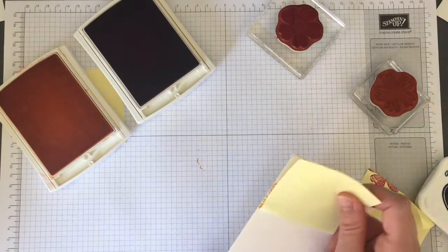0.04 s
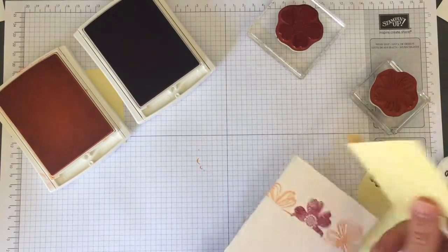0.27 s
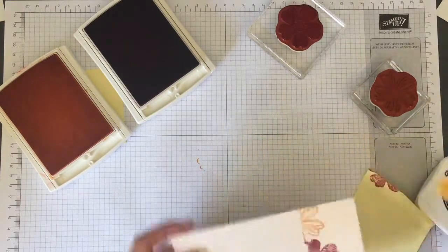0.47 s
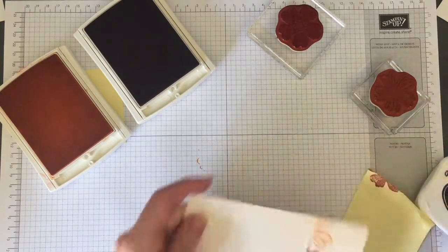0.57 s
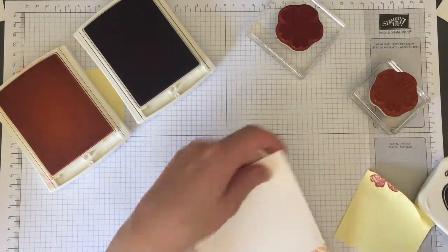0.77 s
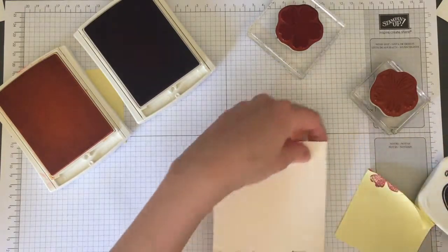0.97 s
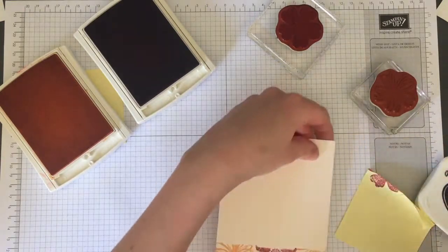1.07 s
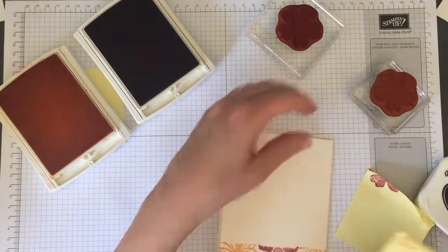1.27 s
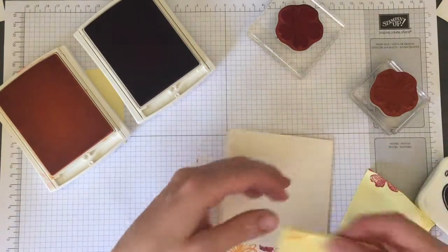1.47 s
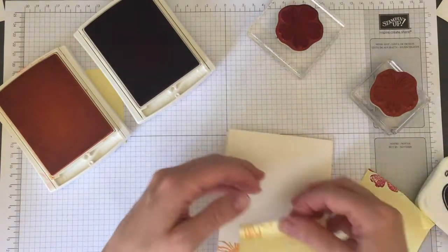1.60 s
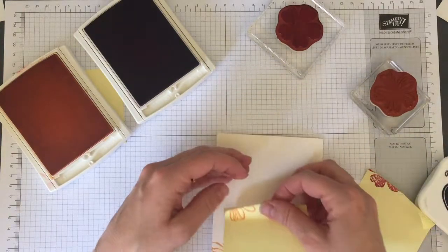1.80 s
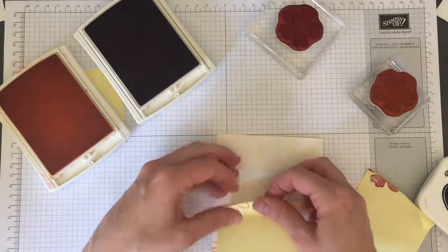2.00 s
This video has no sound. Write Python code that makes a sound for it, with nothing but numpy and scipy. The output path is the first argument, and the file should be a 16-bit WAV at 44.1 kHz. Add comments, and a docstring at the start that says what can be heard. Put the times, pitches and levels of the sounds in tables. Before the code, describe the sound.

Paper handled up close: a sticky note peels free and a card slides and rustles.

```python
"""A sticky note peels off a card, close up: the glue fizzes, its last strands snap, the freed paper flaps.
The card is tapped, then slides over a paper mat with a friction hiss, a catching edge and light knocks.
Fingers brush the paper and hands push softly on the table.
Behind it, a small room with faint rumble, hiss and appliance hum."""
import sys
import numpy as np
from scipy import signal
from scipy.fft import rfft, irfft
from scipy.io import wavfile

SR = 44100
rng = np.random.default_rng(int(sys.argv[2]) if len(sys.argv) > 2 else 0)


def int16_out(signal):
    """Quantize to a 16-bit WAV file."""
    q = np.round(np.clip(np.atleast_2d(signal).T, -1, 1) * 32767)
    wavfile.write(sys.argv[1], SR, q.astype(np.int16))


N = 90404
T = np.arange(N) / SR
HZ = np.fft.rfftfreq(4096, 1 / SR)

# resonances of the note and of the card on the mat: f/Hz, gain/dB
NOTE_RESONANCES = [(1415, 3.5), (2240, 6), (2380, 6.5), (2510, -2), (2810, 6), (3115, 4.5), (3500, 6.5),
                   (3985, 7), (4617, 7), (5327, 5), (6675, 6.5), (7348, 6), (9300, 6)]
CARD_RESONANCES = [(370, 3), (790, 12), (970, 10), (1610, 10), (2500, 11), (3230, 5.5), (4350, 0.5),
                   (5240, 3.5), (6430, 5), (8450, 4.5), (9400, 3), (12300, 5)]
NOTE_Q, CARD_Q = 29.4, 16
# struck card spectrum: f/Hz, level/dB
CARD_SPECTRUM = [(120, -14), (220, -20), (320, 1.5), (600, -3.5), (900, -3.5), (1200, -2), (1500, -1.5),
                 (2500, -4), (8000, -4.5), (16000, 5)]


def amp(db):
    """dB to gain."""
    return 10 ** (np.asarray(db) / 20)


def unit(x):
    """Scale to rms 1."""
    return x / np.sqrt(np.mean(x ** 2) + 1e-20)


def curve(points, hz=HZ):
    """Interpolate over log frequency."""
    f, value = np.transpose(points)
    return np.interp(np.log(hz + 1), np.log(f + 1), value)


def level(points):
    """Gain along a level curve, silent outside it."""
    t_s, db = np.transpose(points)
    return amp(np.interp(T, t_s, db, left=-np.inf, right=-np.inf))


def add(mix, at_s, sound):
    """Mix a sound in at at_s."""
    part = mix[max(round(at_s * SR), 0):][:len(sound)]
    part += sound[:len(part)]


def response(db):
    """Minimum-phase impulse response of a spectrum, energy 1."""
    cepstrum = np.fft.irfft(np.log(amp(np.maximum(db, db.max() - 90))))
    half = len(cepstrum) // 2
    cepstrum[1:half] *= 2
    cepstrum[half + 1:] = 0
    impulse = irfft(np.exp(rfft(cepstrum)))[:half]
    return impulse / np.linalg.norm(impulse)


def ring(hz, db, q):
    """One resonance as a bump in dB; taller means wider skirts."""
    return db / (1 + (2 * q * (HZ / hz - 1)) ** 2 * 10 / (abs(db) + 3.0))


def body(modes, q):
    """All resonances of a sheet, in dB."""
    return sum(ring(hz, db, q) for hz, db in modes)


def grains(size, per_s, spread_db, smooth):
    """Tiny slips of uneven strength over smooth hiss, rms 1."""
    occurs = rng.random(size) < per_s / SR
    strength = amp(spread_db * np.minimum(rng.exponential(1, size), 4))
    slips = occurs * strength * rng.choice([-1., 1.], size)
    return unit(unit(slips) + smooth * rng.standard_normal(size))


def excite(drive, envelope, colour_db):
    """A shaped drive rings the paper; output energy equals the envelope's."""
    out = signal.fftconvolve(drive * envelope, response(colour_db))
    return out * np.linalg.norm(envelope) / (np.linalg.norm(out) + 1e-20)


def taps(rows, sheet_db):
    """A sheet buckles or lands: short low-passed bursts, each with its own peak or dip."""
    out, t = np.zeros(N), np.arange(SR // 8) / SR
    for at_s, rise_s, decay_s, db, ring_hz, ring_db, cutoff_hz in rows:
        envelope = np.minimum(t / rise_s, 1) * np.exp(-np.maximum(t - rise_s, 0) / decay_s)
        rolloff_db = 10 * np.log10(1 + (HZ / cutoff_hz) ** 7.4)
        colour_db = sheet_db + ring(ring_hz, ring_db, q=6) - rolloff_db
        crinkle = grains(len(t), per_s=4000, spread_db=1.5, smooth=0.87)
        add(out, at_s, amp(db) * excite(crinkle, envelope, colour_db))
    return out


def peel():
    """Glue fizzes as it parts; its last strands snap, each scattering through the note."""
    fizz_levels = [(0, -54), (.05, -59.5), (.085, -56.5), (.14, -50.5), (.19, -51.5), (.245, -45.5),
                   (.258, -36.5), (.262, -28.5), (.272, -32), (.288, -57), (.30, -79)]  # t/s, level/dB
    fizz_spectrum = [(200, -9.5), (600, -12), (980, 2.5), (1800, -11.5), (2500, 2.5), (3300, -2),
                     (4100, -0.5), (7000, -3.5), (9500, -2.5), (13000, -4.5), (16000, -5.5)]  # f/Hz, level/dB
    strand_snaps = [(.2522, -10), (.2536, -21), (.2595, -12.5), (.2604, -17.5), (.2609, -20), (.2624, -16),
                    (.265, -16), (.267, -16), (.2685, -17.5), (.2697, -13), (.2701, -13), (.2712, -20),
                    (.2718, -16)]  # t/s, peak/dB
    snap_spectrum = [(150, -45), (600, -24), (1200, -19), (1800, -56), (2400, 4), (4500, 3), (8000, 6),
                     (9500, 8), (12000, 10.5), (14500, 2), (16000, -6.5)]  # f/Hz, level/dB
    scatter_db, scatter_s = -10, 0.00036
    note_db = body(NOTE_RESONANCES, NOTE_Q)
    fizz = grains(N, per_s=3600, spread_db=2.5, smooth=1.0) * level(fizz_levels)
    out = signal.fftconvolve(fizz, response(curve(fizz_spectrum) + note_db))[:N]
    snap_response = response(curve(snap_spectrum) + note_db)
    t = np.arange(SR // 100) / SR
    for at_s, db in strand_snaps:
        scatter = amp(scatter_db) * rng.standard_normal(len(t)) * np.exp(-t / scatter_s)
        snap = signal.fftconvolve((t == 0) + scatter, snap_response)
        add(out, at_s, -amp(db) * snap / abs(snap).max())
    return out


def room_tone():
    """Low rumble, faint hiss and appliance hum."""
    air_spectrum = [(20, -36), (33, -19), (47, 9), (65, 2), (120, 0), (180, -5.5), (280, -10), (500, -14.5),
                    (1000, -15), (2000, -16), (5000, -22.5), (10000, -29.5), (16000, -33)]  # f/Hz, level/dB
    hum_tones = [(48.6, -79), (97, -77.5), (124, -69.5)]  # f/Hz, level/dB
    air_db = -64
    air_gain = amp(curve(air_spectrum, np.fft.rfftfreq(N, 1 / SR)))
    air = irfft(rfft(rng.standard_normal(N)) * air_gain, N)
    hum = sum(amp(db) * np.sqrt(2) * np.sin(2 * np.pi * (hz * T + rng.random())) for hz, db in hum_tones)
    return amp(air_db) * unit(air) + hum


def finger_rubs():
    """The hand rustles on paper; each stroke is coloured by its patch and the hollow under the hand."""
    rustle_levels = [(.33, -57.5), (.38, -68.5), (.45, -64.5), (.54, -62.5), (.63, -71), (1.0, -66),
                     (1.12, -64.5), (1.2, -67), (1.3, -69.5), (1.5, -68.5), (1.64, -73), (1.8, -78),
                     (1.88, -74), (2.05, -77)]  # t/s, level/dB
    skin_spectrum = [(200, -17), (1400, -15.5), (2050, -10.5), (2600, -3.5), (4000, -2), (5200, -3.5),
                     (6500, -1), (9000, -4.5), (12500, -6), (16000, -5)]  # f/Hz, level/dB
    strokes = [(0.435, 0.029, -55.5, 5900, 8), (0.485, 0.036, -56, 5870, 13.5),
               (0.599, 0.024, -56, 12000, 8), (.02, 0.018, -58.5, 4020, 17),
               (0.089, 0.033, -53.5, 2500, 21), (0.146, 0.017, -51.5, 2430, 29),
               (1.08, 0.015, -50, 6735, 17), (1.076, 0.018, -54, 1806, 28.5),
               (1.155, 0.0058, -49, 7010, 12.5), (1.186, 0.029, -55, 1814, 24),
               (1.213, 0.019, -54, 11800, 10), (1.351, 0.013, -55, 3280, 15.5),
               (1.433, 0.045, -59, 11600, 6.5), (1.548, 0.022, -57.5, 3940, 2),
               (1.611, 0.014, -55.5, 4250, 11), (1.677, 0.012, -50.5, 8300, 9),
               (1.682, 0.022, -54.5, 2430, 17), (1.694, 0.017, -46.5, 3310, 11.5),
               (1.80, 0.035, -62, 1840, 33), (1.815, .035, -66, 2290, 21.5)]  # peak t/s, half-length/s, level/dB, ring f/Hz, ring gain/dB
    ripple_hz, ripple_db = 1753, 1  # echo between hand and table
    hollow_db = ripple_db * np.cos(2 * np.pi * HZ / ripple_hz)
    paper_db = curve(skin_spectrum) + 0.4 * body(CARD_RESONANCES, CARD_Q)
    rustle = grains(N, per_s=1400, spread_db=0.5, smooth=0.46) * level(rustle_levels)
    out = signal.fftconvolve(rustle, response(paper_db))[:N]
    friction = grains(N, per_s=4000, spread_db=2.0, smooth=0.61)
    for peak_s, half_s, db, ring_hz, ring_db in strokes:
        swell = np.exp(-np.arange(-3, 3, 1 / (half_s * SR)) ** 2)
        drive = np.roll(friction, -round(peak_s * SR))[:len(swell)]
        colour_db = paper_db + hollow_db + ring(ring_hz, ring_db, q=8)
        add(out, peak_s - len(swell) / 2 / SR, amp(db) * excite(drive, swell, colour_db))
    return out


def note_flaps():
    """The note flexes and flaps as it comes free."""
    flaps = [(.205, 0.00025, 0.0061, -29.5, 2360, 7, 2700), (.2675, 0.0027, 0.0043, -24, 1230, 2.5, 4000),
             (.277, 0.0023, 0.0042, -26, 890, -20, 4730), (.2808, 0.002, 0.0021, -21.5, 3226, 2, 6060),
             (.307, 0.0055, 0.0053, -43, 940, 15, 3170), (.322, 0.00025, 0.007, -34.5, 1420, 15.5, 2750),
             (.3355, 0.0018, 0.0056, -34, 1015, 14, 2490)]  # t/s, rise/s, decay/s, level/dB, ring f/Hz, ring gain/dB, cutoff/Hz
    note_spectrum = [(80, -34), (180, -10.5), (460, -6), (570, -9), (760, -5.5), (1100, 0.5), (1500, -5),
                     (1900, -8), (2400, -1.5), (4000, -4), (8000, -2), (16000, -2)]  # f/Hz, level/dB
    return taps(flaps, curve(note_spectrum) + body(NOTE_RESONANCES, NOTE_Q))


def table_thuds():
    """The table gives under the hands: swells of low narrow-band noise."""
    pushes = [(0.295, 0.012, -52, 172), (0.444, 0.082, -61, 47.8), (0.82, 0.1, -61.5, 53),
              (0.897, 0.017, -54.5, 116), (1.715, 0.067, -57.5, 50)]  # peak t/s, half-length/s, level/dB, f/Hz
    out = np.zeros(N)
    for peak_s, half_s, db, hz in pushes:
        band = 1 / (1 + (np.fft.rfftfreq(N, 1 / SR) / hz - 1) ** 4 * 400)
        rumble = irfft(rfft(rng.standard_normal(N)) * band, N)
        swell = np.exp(-((T - peak_s) / half_s) ** 2)
        out += amp(db) * unit(rumble * swell) * np.sqrt(np.mean(swell ** 2))
    return out


def card_touches():
    """Taps ring the card while it is held in the air."""
    touches = [(.597, 0.0063, 0.0074, -49, 1340, 22, 5200), (0.5, 0.006, 0.0075, -60, 2760, 23, 7500),
               (.652, 0.0053, 0.0047, -42.5, 500, 11, 5900), (.662, 0.0019, 0.0061, -32, 800, 3, 5600)]  # t/s, rise/s, decay/s, level/dB, ring f/Hz, ring gain/dB, cutoff/Hz
    held_resonances = [(456, 5.5), (636, 11), (797, 11), (1380, 8), (1905, 16), (2420, 5), (2760, 6),
                       (3060, 7), (3900, 5.5)]  # f/Hz, gain/dB
    return taps(touches, curve(CARD_SPECTRUM) + body(held_resonances, q=17))


def card_slide():
    """The card hisses over the mat under uneven pressure."""
    slide_levels = [(.63, -60.5), (.65, -52), (.69, -55), (.705, -51), (.733, -43.5), (.757, -50.5),
                    (.78, -41), (.808, -49), (.835, -40.5), (.855, -44), (.897, -41), (.906, -56.5),
                    (.955, -55.5), (.975, -70)]  # t/s, level/dB
    mat_spectrum = [(150, -6), (400, 0.5), (1200, -17), (2000, -1), (2600, -2.5), (4000, 3.5), (6500, -1),
                    (9500, -2), (13000, -6), (16000, 1)]  # f/Hz, level/dB
    pressure_hz, pressure_db = 220.3, 2.5
    wander = np.interp(T * pressure_hz, np.arange(N), rng.standard_normal(N))
    pressure = unit(amp(pressure_db * wander))
    hiss = grains(N, per_s=4100, spread_db=3.0, smooth=1.0) * level(slide_levels) * pressure
    return signal.fftconvolve(hiss, response(curve(mat_spectrum) + body(CARD_RESONANCES, CARD_Q)))[:N]


def paper_scrapes():
    """The sliding card's edge sticks and slips; the last scrape is a finger stroke's sharp start."""
    scrapes = [(0.735, .002, -43, 6000, 18), (0.7381, 0.0071, -31.5, 2170, 7.5),
               (0.7485, 0.0015, -34.5, 6000, 0), (0.764, 0.004, -38, 2750, 19),
               (0.783, 0.0047, -36.5, 8540, 15), (0.785, 0.005, -29.5, 2700, 1.5),
               (0.802, 0.00053, -40, 4400, 15), (0.814, 0.0008, -34, 11000, 23),
               (.821, 0.0073, -30, 3710, 14), (0.8418, 0.0019, -27.5, 2410, 12.5),
               (0.8518, 0.0021, -35, 2620, 16), (0.8694, 0.0013, -34.5, 5300, 11),
               (0.898, 0.0023, -38, 2510, 9), (1.0693, 0.0033, -49, 6640, 14)]  # t/s, length/s, level/dB, ring f/Hz, ring gain/dB
    scrape_spectrum = [(150, -9), (600, -7.5), (1250, -21.5), (2000, -3), (2500, -1), (4300, 3.5),
                       (5000, -1.5), (6300, 1), (8500, -5), (12000, -5.5), (16000, -8)]  # f/Hz, level/dB
    chatter_hz, chatter_depth = 296, 0.64
    rise_s, decay_s = 0.00047, 0.0016
    paper_db = curve(scrape_spectrum) + body(CARD_RESONANCES, CARD_Q)
    out, t = np.zeros(N), np.arange(SR // 25) / SR
    chatter = unit(1 + chatter_depth * np.cos(2 * np.pi * chatter_hz * (t - rise_s)))
    for at_s, length_s, db, ring_hz, ring_db in scrapes:
        envelope = chatter * np.minimum(t / rise_s, 1) * np.exp(-np.maximum(t - length_s, 0) / decay_s)
        friction = grains(len(t), per_s=4000, spread_db=0, smooth=0.63)
        add(out, at_s, amp(db) * excite(friction, envelope, paper_db + ring(ring_hz, ring_db, q=6.5)))
    return out


def card_knocks():
    """The card knocks on the mat and rings briefly."""
    knocks = [(.74, 0.004, 0.016, -42, 424, 16, 2280), (.8422, 0.00039, 0.0068, -36, 1520, 6.5, 1970),
              (.845, 0.0113, 0.01, -44, 387, 8, 1160), (.872, 0.011, 0.015, -49, 343, -3, 1860),
              (.925, 0.0068, 0.0059, -48, 1020, 17, 1490), (1.2364, 0.00059, 0.016, -48.5, 1736, 10, 10200),
              (1.258, 0.00051, 0.0047, -44.5, 2880, 7, 3370), (1.258, 0.0023, 0.0036, -42.5, 986, 16, 1670),
              (1.7605, 0.00075, 0.002, -50, 2240, 13, 3440)]  # t/s, rise/s, decay/s, level/dB, ring f/Hz, ring gain/dB, cutoff/Hz
    return taps(knocks, curve(CARD_SPECTRUM) + body(CARD_RESONANCES, CARD_Q))


def room(x):
    """Bounces off the table and things on it, plus a small room's short tail."""
    bounces = [(.0013, -22), (.0031, -21), (0.012, -27.5)]  # delay/s, gain/dB
    decay_times = [(150, 0.46), (1000, 0.15), (4000, 0.2), (9000, 0.11), (16000, 0.097)]  # f/Hz, T60/s
    tail_delay_s, tail_db = 0.004, -15
    hz, t, noise = signal.stft(rng.standard_normal(SR // 2), SR, nperseg=256)
    decay = amp(-60 * t / curve(decay_times, hz)[:, None])
    tail = signal.istft(noise * decay, SR)[1]
    out = x.copy()
    add(out, tail_delay_s, amp(tail_db) * signal.fftconvolve(x, tail / np.linalg.norm(tail)))
    for delay_s, db in bounces:
        add(out, delay_s, amp(db) * x)
    return out


def scene():
    """Paper sounds in the room, over table thuds and room tone; mono."""
    note = peel() + note_flaps()
    handling = card_touches() + card_slide() + paper_scrapes() + card_knocks() + finger_rubs()
    return (room(note + handling) + table_thuds() + room_tone())[None]


def record(dry):
    """Low-pass band limit."""
    cutoff_hz = 15850
    lowpass = signal.firwin(401, cutoff_hz, window=("kaiser", 8), fs=SR)
    return signal.oaconvolve(dry, lowpass[None], "same")


dry = scene()
out = record(dry)
int16_out(out)
```